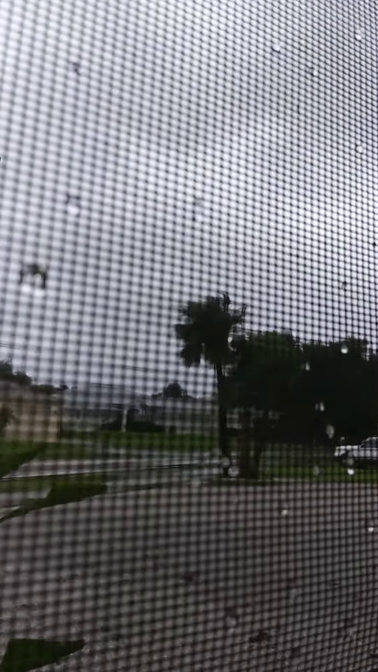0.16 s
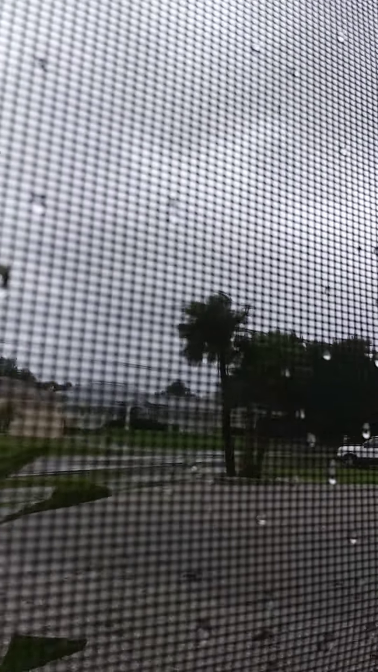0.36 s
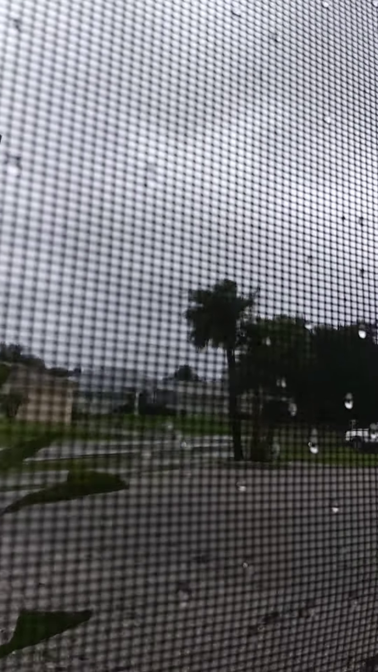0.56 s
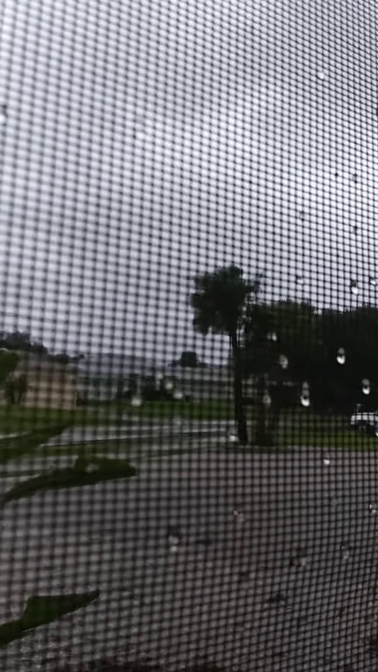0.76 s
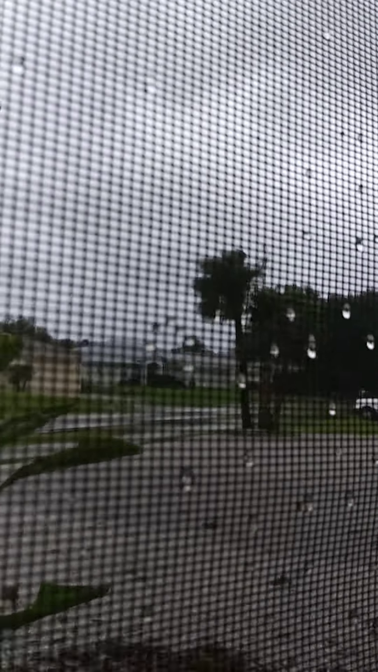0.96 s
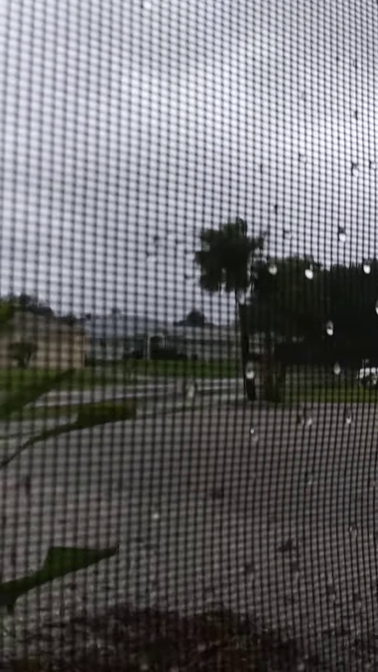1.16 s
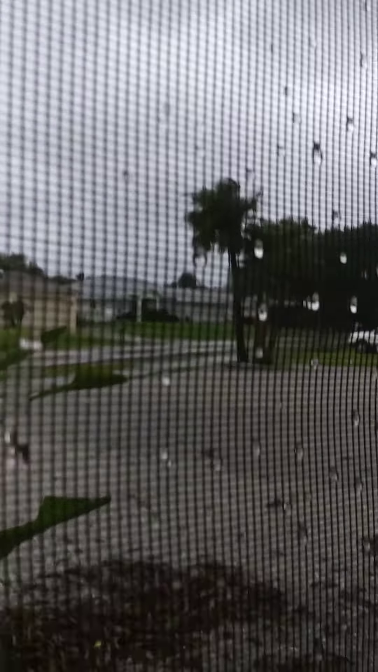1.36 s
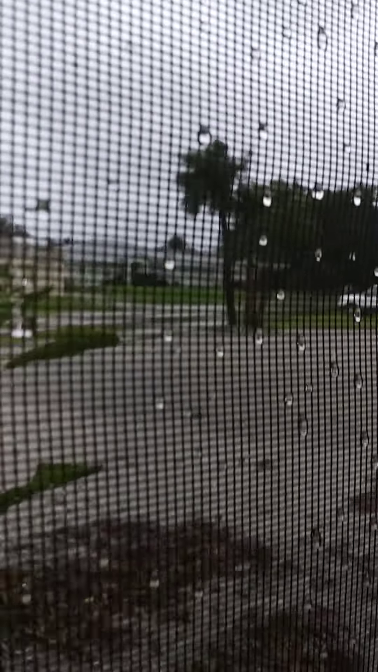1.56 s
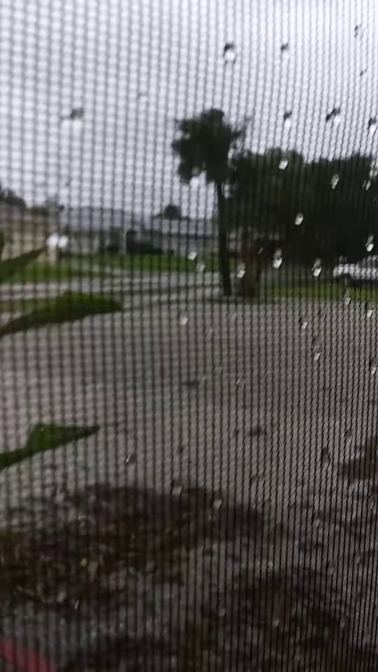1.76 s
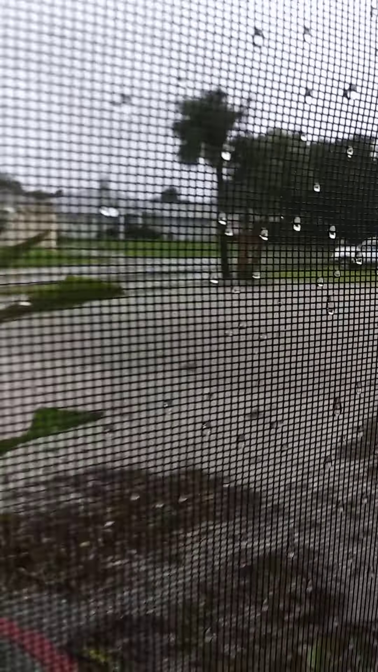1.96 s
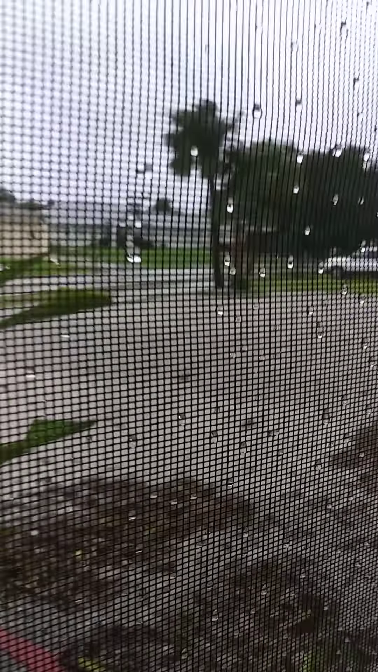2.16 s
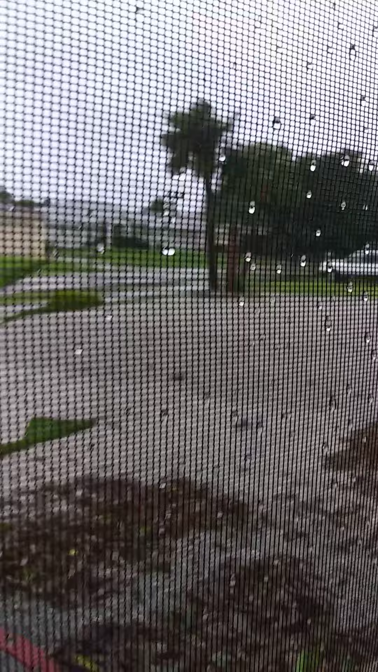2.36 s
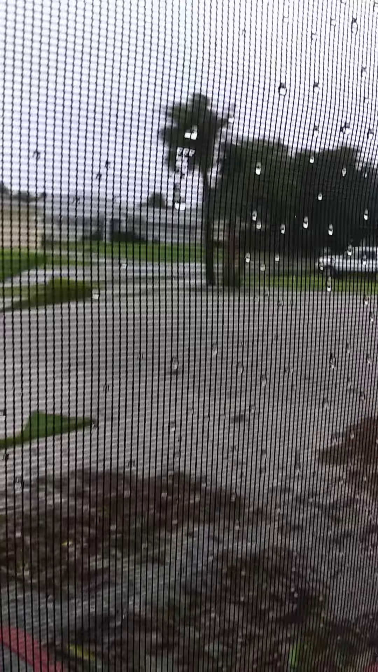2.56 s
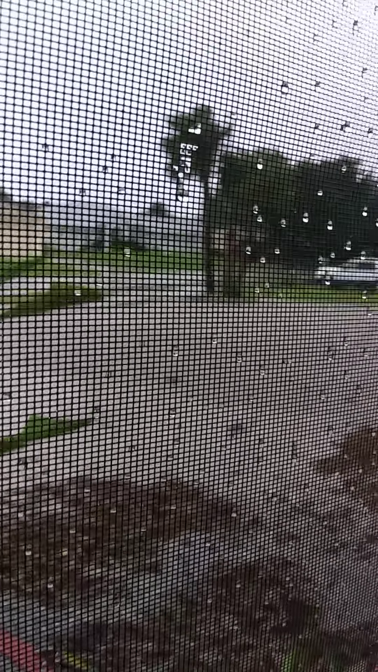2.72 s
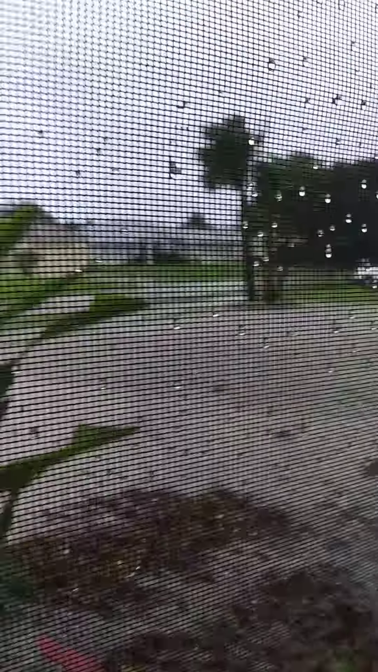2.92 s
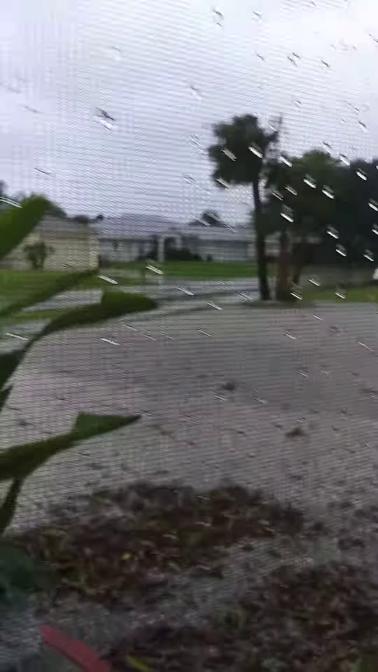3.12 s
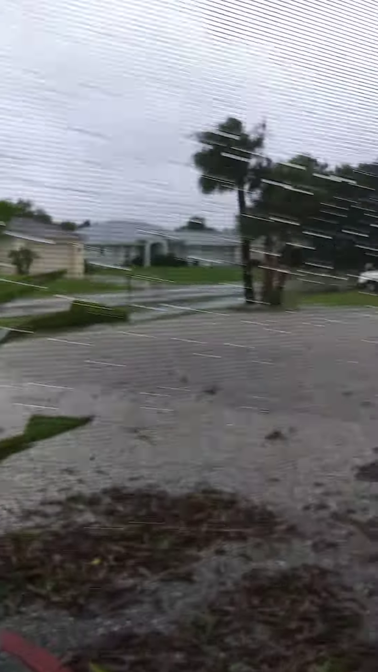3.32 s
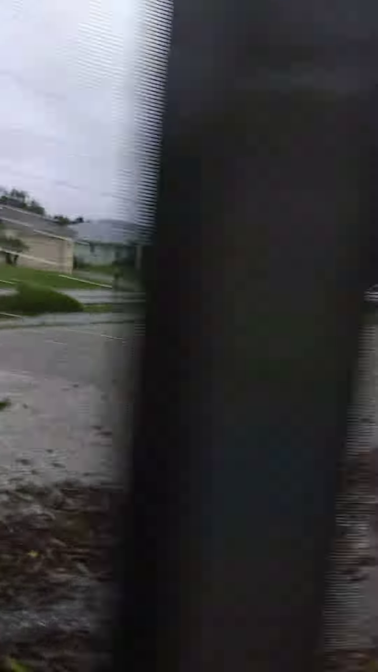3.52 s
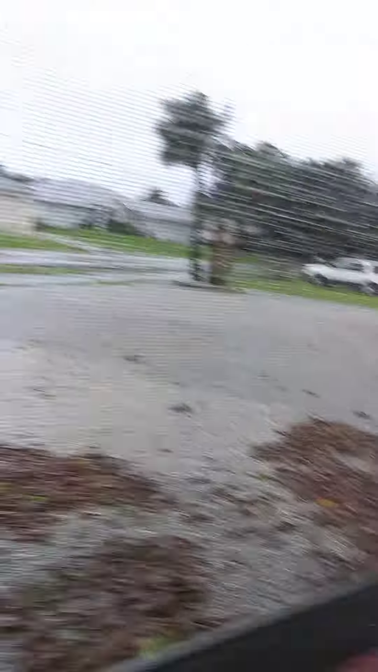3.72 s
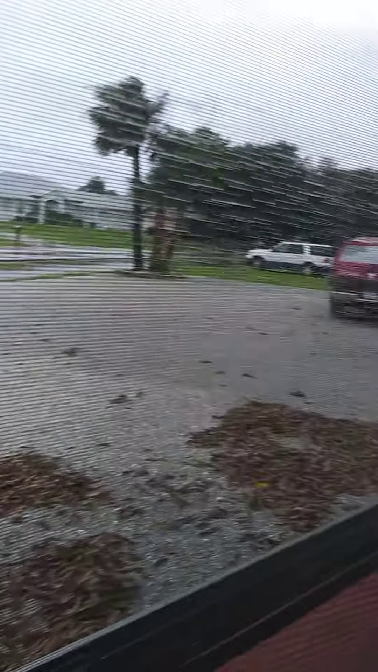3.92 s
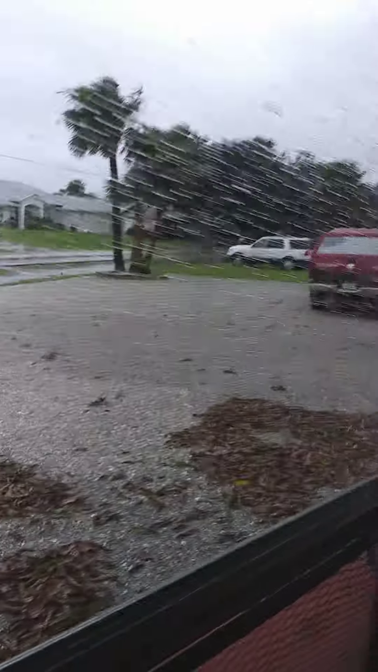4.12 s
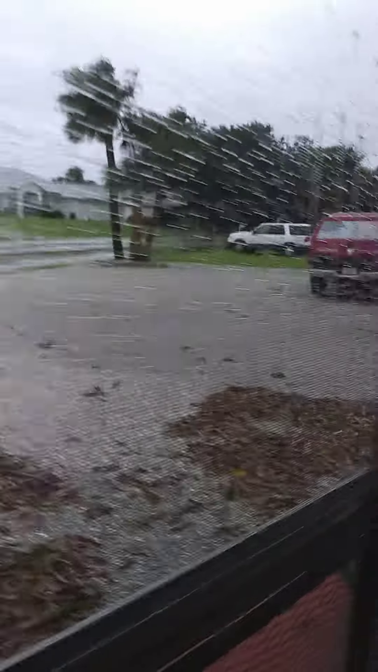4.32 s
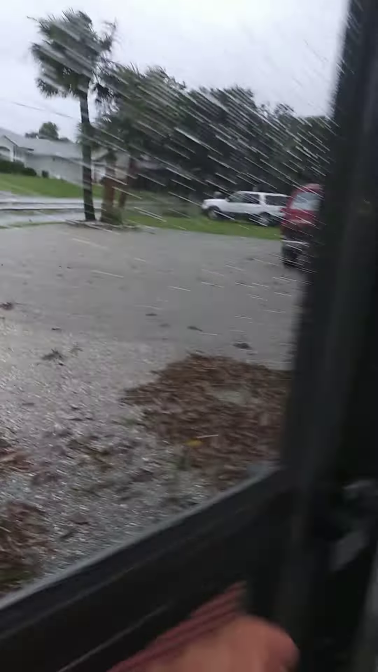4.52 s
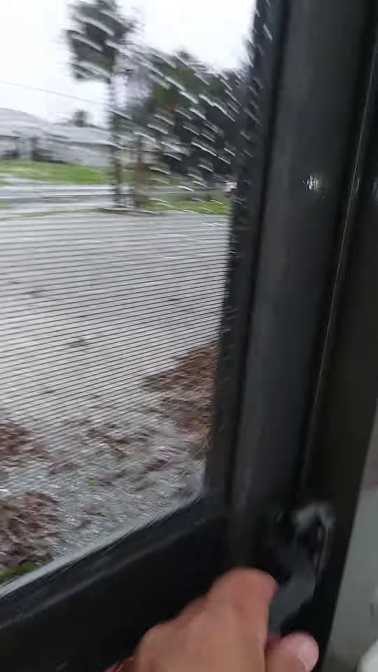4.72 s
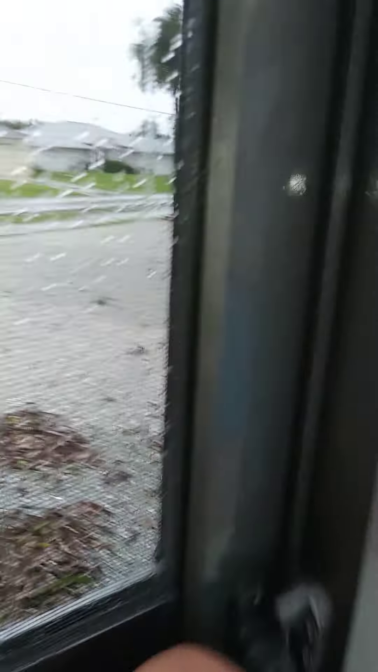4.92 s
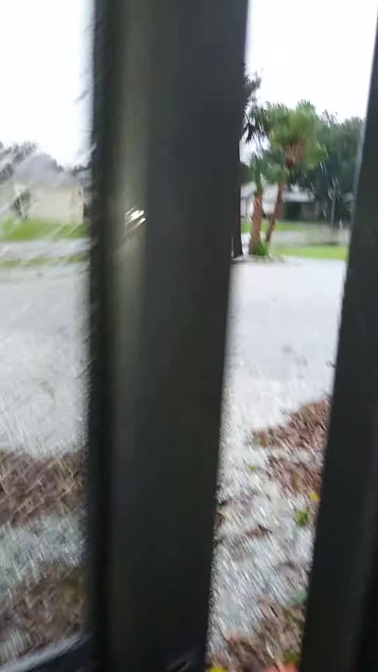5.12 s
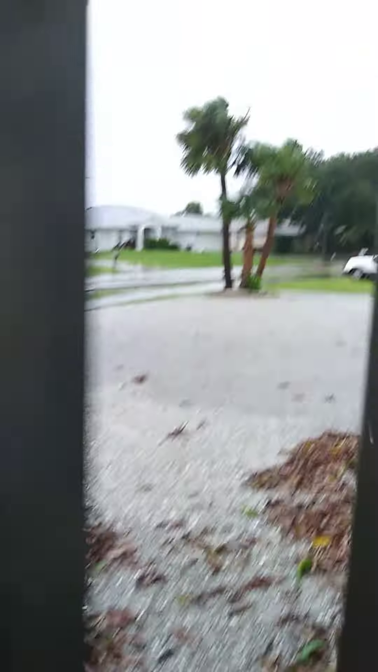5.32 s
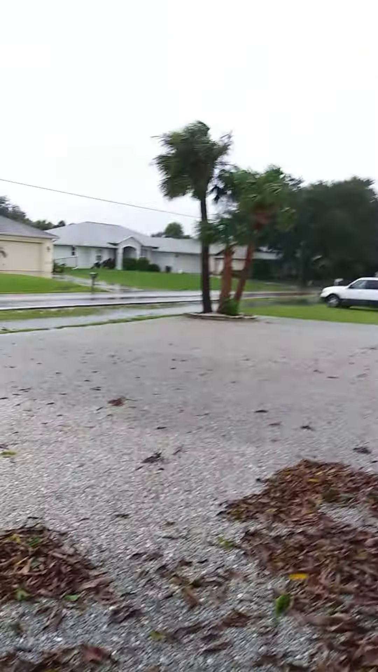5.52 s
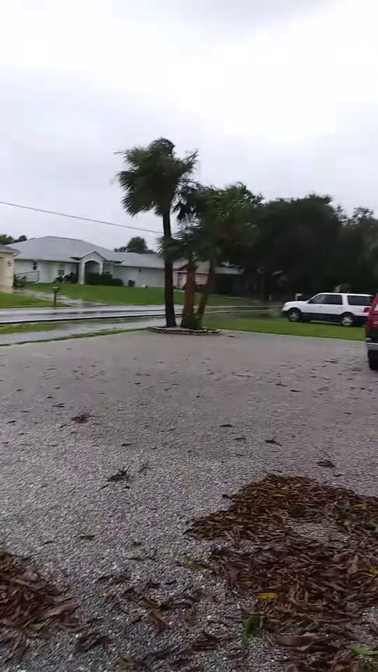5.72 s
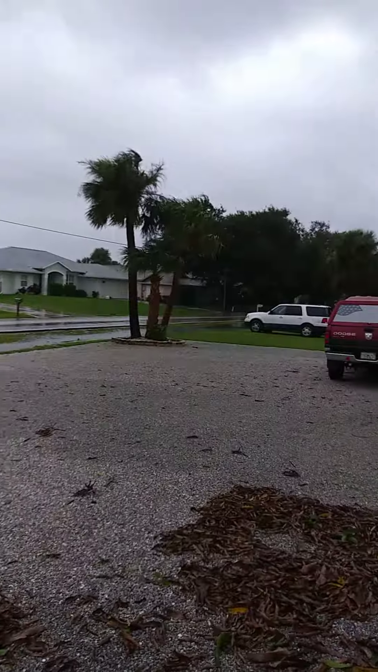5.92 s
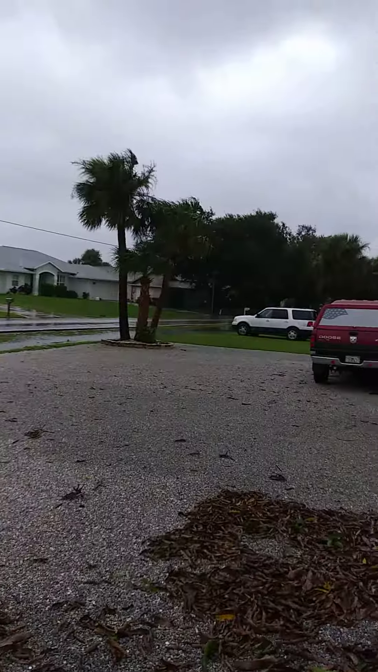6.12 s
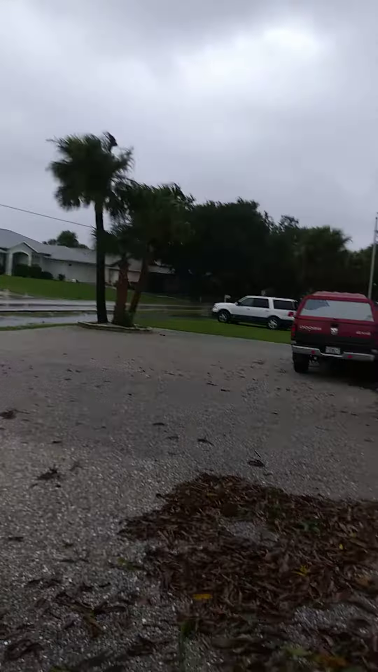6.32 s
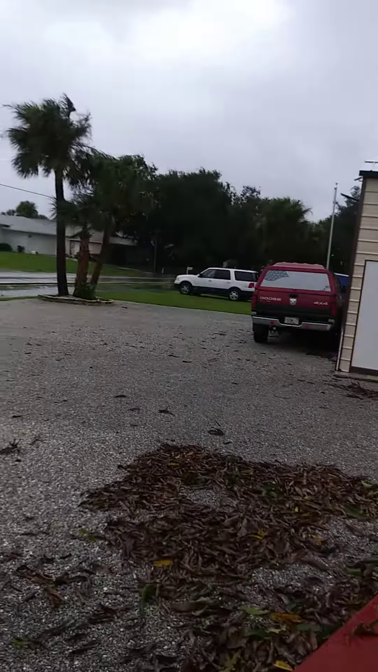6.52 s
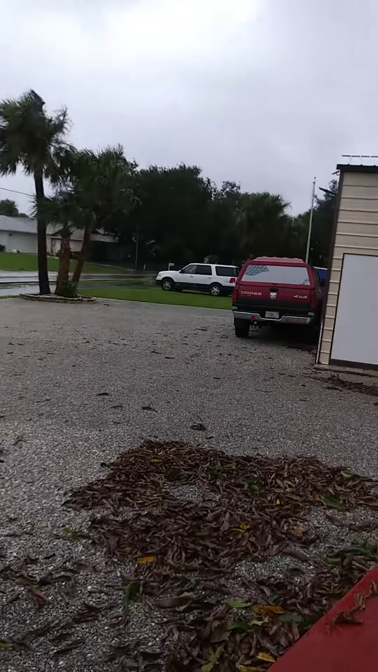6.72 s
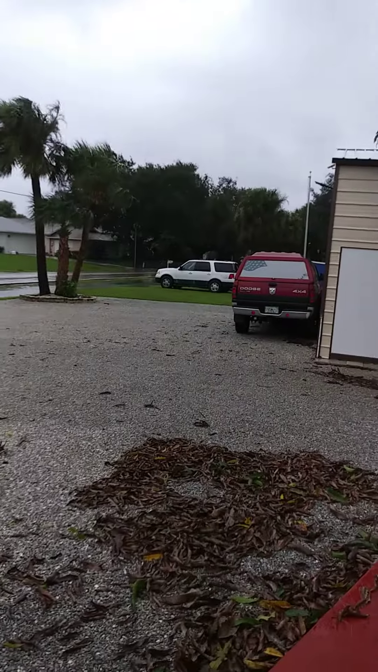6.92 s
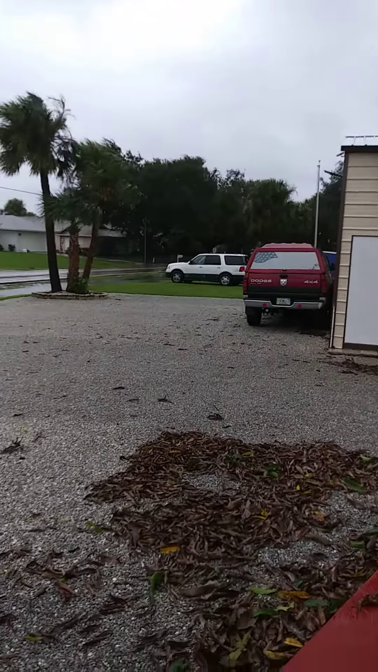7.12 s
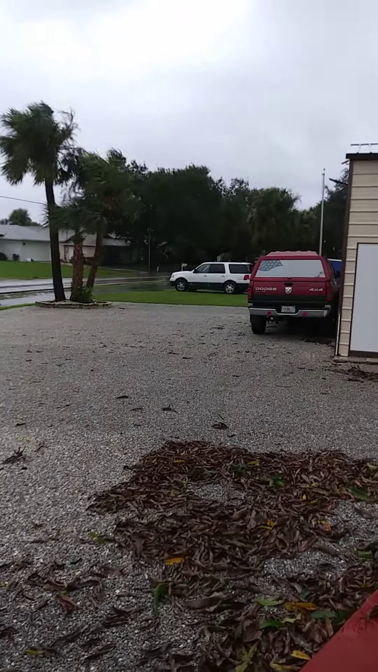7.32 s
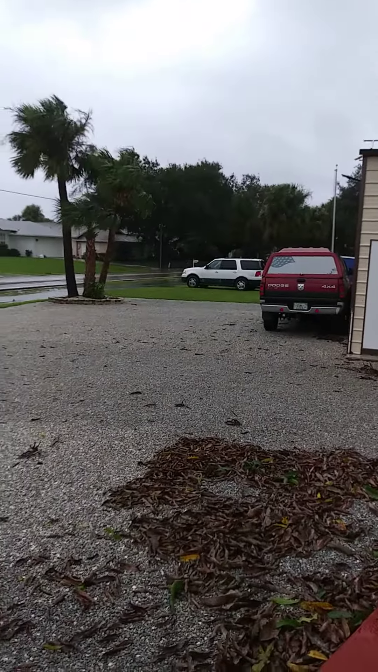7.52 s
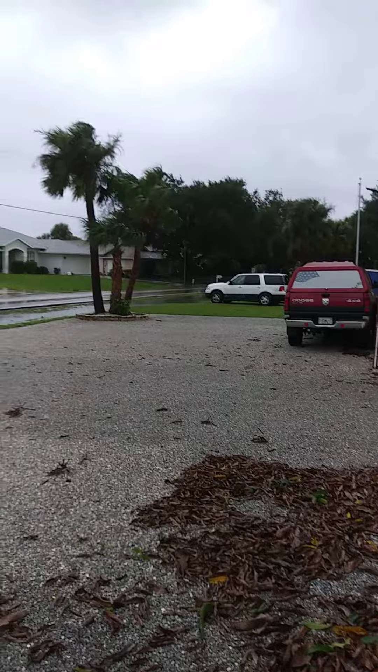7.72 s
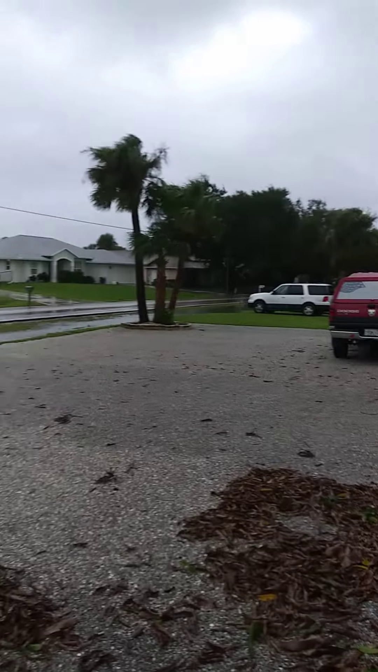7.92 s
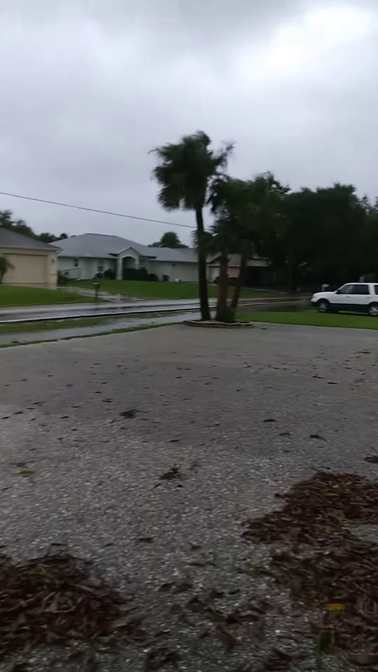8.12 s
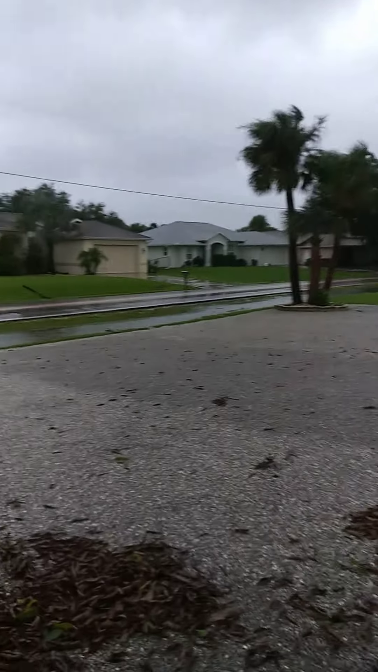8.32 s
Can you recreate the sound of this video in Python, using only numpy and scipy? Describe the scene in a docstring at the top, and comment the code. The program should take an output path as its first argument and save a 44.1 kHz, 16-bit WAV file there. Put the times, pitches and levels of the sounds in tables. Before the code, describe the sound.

Storm wind and rain rush steadily while a metal screen door unlatches, scrapes open and later knocks against its frame.

```python
"""Storm wind roars and rain hisses round a screened porch, and drops tick on the mesh.
Three close, heavily damped taps sound, then softer ones. The latch of an aluminium screen door
snaps, and the door scrapes open in a few short pushes by stick-slip friction, which excites its
modes. Near the end it knocks against its frame. The wind is turbulent noise and the rain a mass
of random impacts; both swell with the gusts."""
import sys
import numpy as np
from scipy import signal
from scipy.fft import rfft, irfft
from scipy.io import wavfile
from scipy.ndimage import uniform_filter1d

SR = 44100
rng = np.random.default_rng(int(sys.argv[2]) if len(sys.argv) > 2 else 0)


def int16_out(signal):
    """Quantize to a 16-bit WAV file."""
    q = np.round(np.clip(np.atleast_2d(signal).T, -1, 1) * 32767)
    wavfile.write(sys.argv[1], SR, q.astype(np.int16))


N = 369116
T = np.arange(N) / SR
AGE = T[:SR // 3]  # time since the onset of a short sound [s]

# pushes that drag the door open: (start [s], length [s], grind level [dB])
PUSHES = [(5.051, 0.17, -31.5), (5.261, 0.135, -29.5), (5.55, 0.1, -27), (5.72, 0.054, -29.5),
          (5.874, 0.12, -29)]


def door_blows():
    """Impact excitation: each blow shakes the panels round one main pitch and snaps the latch."""
    # blows on the door: (time [s], level [dB], main pitch [Hz], relative snap level [dB])
    blows = [(4.9444, -18, 1860, -12), (4.947, -17.5, 2200, 3.5), (4.9536, -14, 2020, -17),
             (4.959, -11, 980, -28), (4.9668, -16, 1720, 0.5), (4.984, -18.5, 1470, -9),
             (4.999, -18.5, 1420, -6.5), (5.0078, -13, 1880, -29), (5.04, -21.5, 810, -28),
             (5.0578, -18.5, 1850, -35), (8.1087, -11.5, 1360, -23), (8.115, -14, 1900, -31),
             (8.1287, -19, 1370, -36)]
    # dense ring of the panels: (frequency [Hz], spectral level [dB])
    panel_spectrum = [(70, -29), (200, -37), (500, -8.5), (800, -4), (1100, 3.5), (2100, 2), (2700, -2),
                      (3500, -23), (5200, -17), (8000, -54), (15000, -52)]
    # bright snap of the latch: (frequency [Hz], spectral level [dB])
    latch_spectrum = [(100, -65), (1000, -21), (2600, 13.5), (4000, -5.5), (7500, 0), (10400, -8),
                      (11500, -22), (15500, -27)]
    panel_decay, snap_decay = fade(t60=0.035), fade(t60=0.065)
    out = np.zeros(N)
    for start, db, hz, snap_db in blows:
        panel = colour(short_noise() * panel_decay, panel_spectrum)
        pitched = band(panel, hz, 0.32 * hz, 0.76 * hz)
        body = (unit(pitched) + 0.86 * unit(panel)) * np.sqrt(np.mean(panel_decay ** 2))
        snap = unit(colour(short_noise(), latch_spectrum)) * snap_decay
        add(out, start, amp(db) * (body + amp(snap_db) * snap))
    # the frame thrums low when the latch first lets go
    thrum = unit(band(short_noise(), 400, 360, 360)) * fade(t60=0.4)
    add(out, blows[0][0], amp(-33.5) * thrum)
    return out + amp(-14.5) * door_ring(out)


def door_scrape():
    """Stick-slip friction: a dense, juddering grind and single hard catches set the door ringing."""
    # the hardest catches: (time [s], peak level [dB])
    catches = [(5.168, -13), (5.266, -15.5), (5.283, -16), (5.368, -21), (5.385, -19), (5.549, -15.5),
               (5.556, -14.5), (5.58, -14), (5.598, -17.5), (5.6168, -9), (5.627, -18), (5.647, -15),
               (5.660, -12), (5.688, -14), (5.7163, -14), (5.782, -13), (5.853, -16), (5.893, -14),
               (5.928, -18), (5.993, -22)]
    # sound of a slip: (frequency [Hz], spectral level [dB])
    slip_spectrum = [(100, -44), (300, -22), (600, -4.5), (1250, 3), (2200, 4), (2700, -8), (3400, -24),
                     (5200, -22), (7000, -33.5), (10000, -42), (15000, -64)]
    effort = sum(amp(db) * stroke(start, length) for start, length, db in PUSHES)
    judder_hz = 62 * (1 + 0.25 * wander(rate=30))
    judder_db = 0.5 * np.sin(2 * np.pi * np.cumsum(judder_hz) / SR)
    grind = unit(colour(patter(rate=1500, spread_db=2), slip_spectrum)) * effort * amp(judder_db)
    slips = np.zeros(N)
    stick_s = 0.004
    for start, db in catches:
        # the door sticks and quietens just before it lets go, then chatters briefly
        grind *= 1 - 0.5 * np.exp(-((T - start) / stick_s + 1) ** 2)
        slip = colour(short_noise() * fade(t60=0.016), slip_spectrum)
        add(slips, start, amp(db) * unit_peak(slip))
    friction = grind + slips
    return friction + amp(-16.5) * door_ring(friction)


def door_ring(force):
    """Modal superposition: the door's response is the force convolved with a sum of damped sines."""
    # modes of the aluminium door: (frequency [Hz], level [dB], T60 [s])
    modes = [(305.5, -2.5, 0.5), (455.7, -2.5, 0.45), (620, 0, 0.39), (996, -6, 0.31), (1135, -1, 0.18),
             (1300, 2, 0.19), (1467, 2, 0.11), (1633, 4.5, 0.13), (2010, -12, 0.46), (2030, -1, 0.15),
             (2250, -7, 0.13), (2400, 0.5, 0.13), (3200, -17, .09), (4700, -2, 0.12), (5170, -19, 0.12)]
    ring = sum(amp(db) * fade(t60) * np.sin(2 * np.pi * hz * AGE) for hz, db, t60 in modes)
    return signal.fftconvolve(force, ring / np.linalg.norm(ring))[:len(force)]


def seal_brush():
    """Sliding friction: from the first push the seal brushes the frame ever more lightly until clear."""
    # brushing of the seal: (frequency [Hz], spectral level [dB])
    spectrum = [(300, -23), (3400, 2), (5000, 0), (6500, -6), (9000, -8), (11000, -23), (15000, -34)]
    brush = unit(colour(patter(rate=870, spread_db=1), spectrum))
    return amp(-46) * brush * stroke(start=PUSHES[0][0], length=0.38, sag_db_per_s=21)


def hinge():
    """Stick-slip in a dry hinge: tiny slips excite one bright resonance and fade as the swing slows."""
    scratch = unit(band(patter(rate=220, spread_db=2), 3970, 1240, 1240))
    return amp(-47.5) * scratch * stroke(start=6.095, length=0.19, sag_db_per_s=45)


def squeaks():
    """Narrow resonance: a burst of noise in a metal part of the door gives a thin, rough squeak."""
    # squeaks and pings: (time [s], level [dB], pitch [Hz], length [s])
    events = [(3.145, -37, 2320, 0.017), (4.146, -41, 2110, 0.15), (5.623, -46, 4670, 0.02),
              (5.717, -41, 5260, 0.012), (5.849, -50, 5860, 0.013), (5.918, -47.5, 5600, .025),
              (5.988, -46.5, 5200, 0.011), (6.03, -53.5, 5500, .012), (8.1095, -42, 8000, 0.0022),
              (8.113, -39, 13100, 0.0029)]
    out = np.zeros(N)
    for start, db, hz, length in events:
        squeak = band(burst(length), hz, 0.084 * hz, 0.25 * hz)
        add(out, start, amp(db) * unit_over(squeak, length))
    return out


def taps():
    """Damped free vibration: each close, dry tap is a contact click and a very short ring."""
    # taps: (time [s], ring peak level [dB], pitch [Hz], T60 [s], relative click level [dB])
    events = [(2.9178, -7.5, 1210, 0.0033, -4), (2.9543, -15.5, 616, 0.0098, 5),
              (3.0029, -6, 1100, 0.005, -3), (4.021, -30, 497, 0.018, -14),
              (4.046, -21.5, 1990, 0.012, -22), (4.137, -27.5, 590, .01, -9), (4.562, -25, 1660, .007, -16),
              (4.617, -22, 1780, 0.0063, -16)]
    click = band(band(fade(t60=0.0004), 2000, 1100), 2700, 5500)
    out = np.zeros(N)
    for start, db, hz, t60, click_db in events:
        ring = band(np.sin(2 * np.pi * hz * AGE) * fade(t60), hz, 1.15 * hz)
        add(out, start, amp(db) * (unit_peak(ring) + amp(click_db) * unit_peak(click)))
    return out


def rustles():
    """Friction noise: skin sliding on a surface gives a short hiss over a dull rub."""
    # rustles of a hand: (time [s], hiss level [dB], length [s], relative rub level [dB])
    events = [(1.858, -55, 0.033, -10), (2.95, -33.5, 0.0047, 2), (3.005, -40, 0.016, 11.5),
              (4.191, -47.5, 0.029, -2), (4.232, -51.5, 0.028, -5), (4.31, -54, 0.033, -8),
              (4.603, -49, 0.022, 8)]
    # hiss of sliding skin: (frequency [Hz], spectral level [dB])
    skin_spectrum = [(200, -22), (1500, 1), (3800, -3), (6300, 5), (9000, -6), (11500, -12), (15500, -37)]
    out = np.zeros(N)
    for start, db, length, rub_db in events:
        hiss = colour(burst(length), skin_spectrum)
        rub = band(band(burst(length), 930, 1000), 940, 1400)
        add(out, start, amp(db) * (unit_over(hiss, length) + amp(rub_db) * unit_over(rub, length)))
    return out


def drops():
    """Impact on a resonator: each big drop splats on the mesh with a short pitched tick."""
    # the biggest drops on the screen: (time [s], peak level [dB], pitch [Hz])
    impacts = [(0.377, -36.5, 4930), (0.606, -37.5, 5100), (1.2545, -35.5, 4300), (1.4656, -39, 4480),
               (1.6337, -37, 4500), (1.815, -36.5, 4190), (1.936, -34.5, 4540), (2.462, -38, 4400),
               (3.1712, -36, 4580), (6.6657, -33.5, 4740), (8.0511, -36, 4360)]
    out = np.zeros(N)
    for start, db, hz in impacts:
        splat = band(short_noise() * fade(t60=0.054), hz, 1100, 1400)
        add(out, start, amp(db) * unit_peak(splat))
    return out


def wind(gust_db):
    """Turbulence: eddies swell separate bands of a broad roar, and gusts add a low rumble."""
    # wind in the trees: (frequency [Hz], spectral level [dB])
    spectrum = [(30, -25), (85, -40.5), (150, -22.5), (280, -8), (460, -5.5), (680, -2.5), (980, 0),
                (1280, -2.5), (1600, -1.5), (2170, -3), (2800, -9.5), (3350, -22.5), (4600, -57),
                (8000, -56)]
    roar = unit(colour(rng.standard_normal(N), spectrum))
    eddies = sum(band(roar, hz, hz / 2) * wander(rate=7) for hz in (250, 530, 1000, 2000))
    rumble = unit(band(rng.standard_normal(N), 157, 80, 80))
    return (roar + 0.056 * eddies) * amp(-37 + gust_db) + rumble * amp(-77.5 + 8.1 * gust_db)


def rain(gust_db):
    """Shot noise: far drops merge into a hiss, near ones patter out of it; gusts drive both harder."""
    # rain on the ground: (frequency [Hz], spectral level [dB])
    spectrum = [(100, -26), (2000, -16), (3400, -1), (5000, 1), (6400, -4), (9000, -7.5), (11300, -18),
                (15500, -21.5)]
    near = unit(patter(rate=700, spread_db=5))
    hiss = unit(colour(rng.standard_normal(N) + 0.37 * near, spectrum))
    # small drips ring briefly on the wet mesh, the finest ones highest
    drips = sum(amp(db) * unit(band(patter(rate=16, spread_db=4), hz, 600, 1100))
                for hz, db in [(4000, -17), (5000, -18), (7400, -19.5), (8800, -22)])
    # the rain eases slightly just before the door is unlatched
    rain_easing_db = np.interp(T, [4.2, 4.52], [0, -0.9])
    flicker_db = 1.13 * wander(rate=23)
    return (hiss + drips) * amp(-54.2 + 0.7 * gust_db + rain_easing_db + flicker_db)


def amp(db):
    """Decibels to amplitude ratio."""
    return 10 ** (np.asarray(db) / 20)


def unit(x):
    """Normalise to rms 1."""
    return x / np.sqrt(np.mean(x ** 2))


def unit_peak(x):
    """Normalise to peak 1."""
    return x / np.abs(x).max()


def unit_over(x, length):
    """Normalise to the energy of rms 1 held for length [s]."""
    return x * np.sqrt(length * SR) / np.linalg.norm(x)


def add(out, start, x):
    """Superpose x on out from start [s]."""
    i = int(start * SR)
    out[i:i + len(x)] += x[:N - i]


def fade(t60):
    """Exponential decay, 60 dB down after t60 [s]."""
    return np.exp(-np.log(1000) * AGE / t60)


def stroke(start, length, sag_db_per_s=0):
    """Envelope of a push: a linear rise, a hold that may sag, then an exponential coast to rest."""
    attack_s, coast_t60_s = 0.027, 0.21
    age = T - start
    rise = np.clip(1 + age / attack_s, 0, 1)
    hold = amp(-sag_db_per_s * np.clip(age, 0, length))
    coast = np.exp(-np.log(1000) * np.maximum(age - length, 0) / coast_t60_s)
    return rise * hold * coast


def band(x, hz, *widths_hz):
    """Resonators in series, one for each bandwidth, with gain 1 at their common centre."""
    for width_hz in widths_hz:
        x = signal.lfilter(*signal.iirpeak(hz, hz / width_hz, fs=SR), x)
    return x


def colour(x, spectrum, size=4096):
    """Minimum-phase filter with the outline (frequency [Hz], level [dB])."""
    hz, db = np.transpose(spectrum)
    bin_hz = np.arange(size // 2 + 1) * SR / size
    log_gain = np.log(amp(np.interp(np.log(bin_hz + 1), np.log(hz), db)))
    cepstrum = irfft(log_gain)[:size // 2]
    cepstrum[1:] *= 2  # folding the cepstrum makes the filter causal
    impulse_response = irfft(np.exp(rfft(cepstrum, size)))
    return signal.fftconvolve(x, impulse_response)[:len(x)]


def wander(rate):
    """Smooth random drift of rms 1 through rate points a second."""
    step = int(SR / rate)
    points = rng.standard_normal(N // step + 2)
    drift = np.interp(np.arange(N) / step, np.arange(len(points)), points)
    return unit(uniform_filter1d(drift, step // 2))


def patter(rate, spread_db):
    """Poisson process: impulses of uneven size, on average rate a second."""
    sizes = amp(spread_db * np.clip(rng.standard_normal(N), -2, 2))
    return (rng.random(N) < rate / SR) * sizes * rng.choice([-1, 1], N)


def short_noise():
    """White noise for one short sound."""
    return rng.standard_normal(len(AGE))


def burst(length):
    """Noise with a quick rise and a Gaussian decay over length [s]."""
    progress = AGE / length
    return short_noise() * np.minimum(progress * 4, 1) * np.exp(-progress ** 2)


def scene():
    """Superposition: the storm, the small close sounds and the door add in one channel."""
    # strength of the gusts: (time [s], level above the usual wind [dB])
    gusts = [(0, -0.2), (1.25, -0.2), (1.85, 1.2), (2.7, 0.5), (3.2, 1.4), (3.8, 0), (4.15, 0.1),
             (4.5, -0.1), (6.35, -1.5), (7.0, -0.4), (8.35, 0.5)]
    gust_db = np.interp(T, *np.transpose(gusts))
    storm = wind(gust_db) + rain(gust_db) + drops()
    close_sounds = taps() + rustles()
    door = door_blows() + door_scrape() + seal_brush() + hinge() + squeaks()
    return (storm + close_sounds + door)[None]


def record(dry):
    """Band limiting and soft saturation: deep bass is cut, peaks are rounded, the top is cut."""
    highpass = signal.butter(2, 110, "highpass", fs=SR, output="sos")
    lowpass = signal.ellip(10, 0.2, 70, 15800, fs=SR, output="sos")
    rounded = np.tanh(signal.sosfilt(highpass, dry))
    return signal.sosfilt(lowpass, rounded)


dry = scene()
out = record(dry)
int16_out(out)
```